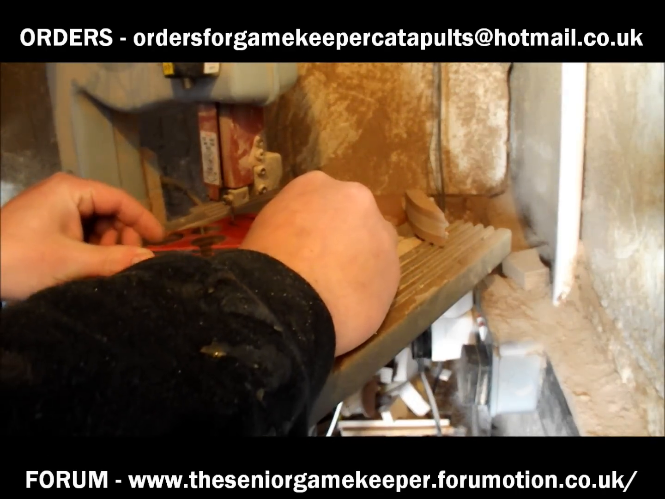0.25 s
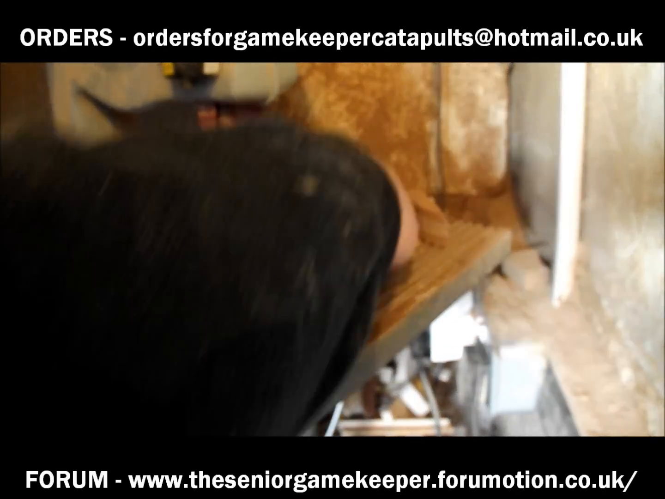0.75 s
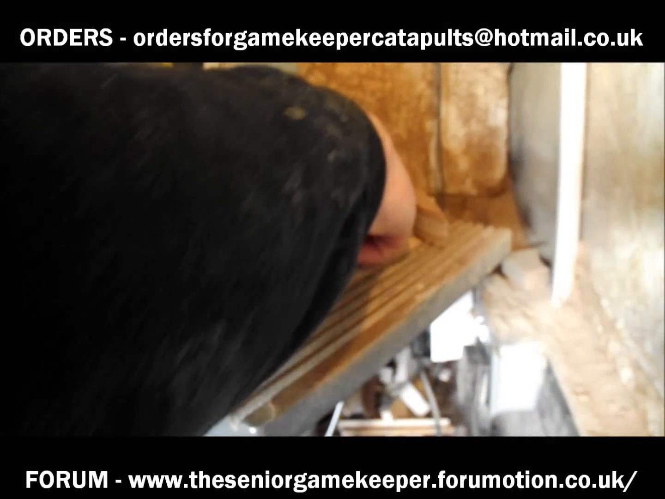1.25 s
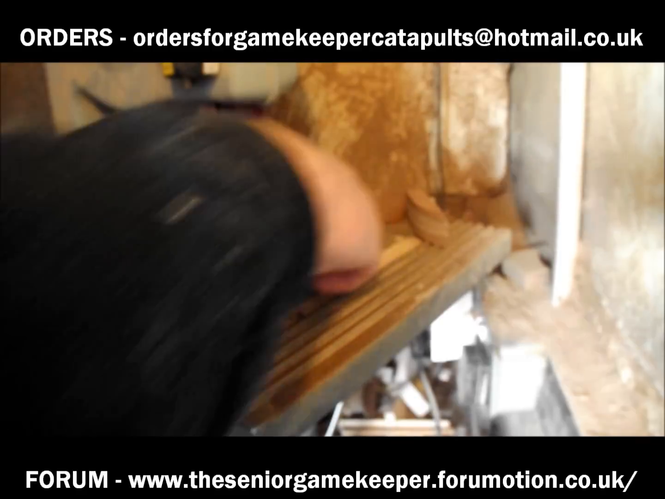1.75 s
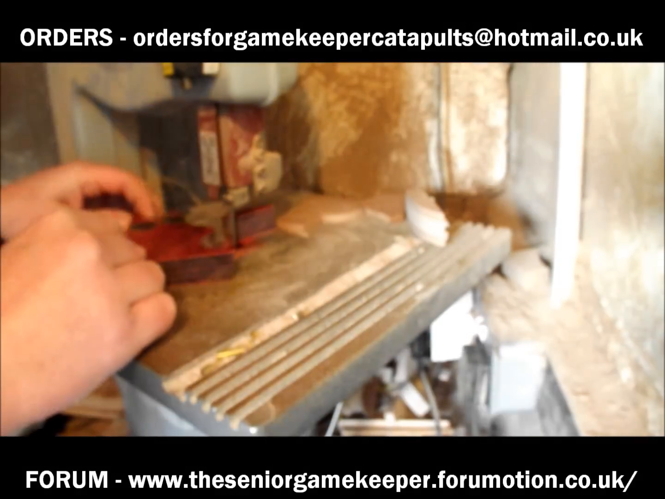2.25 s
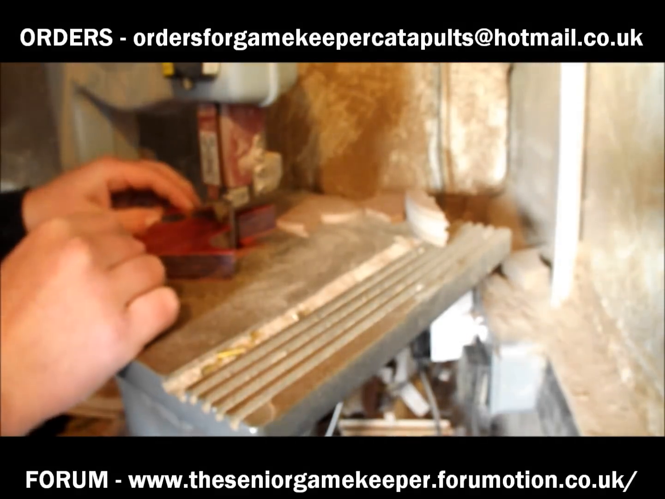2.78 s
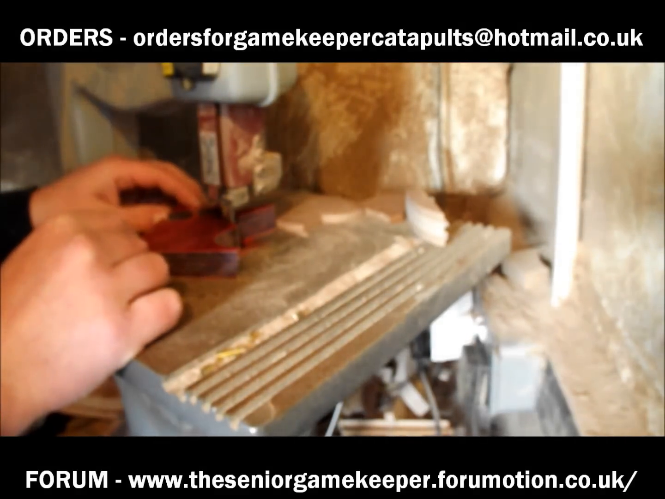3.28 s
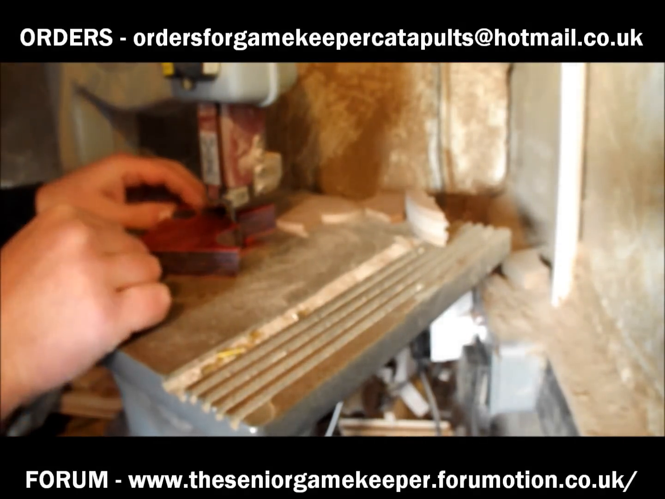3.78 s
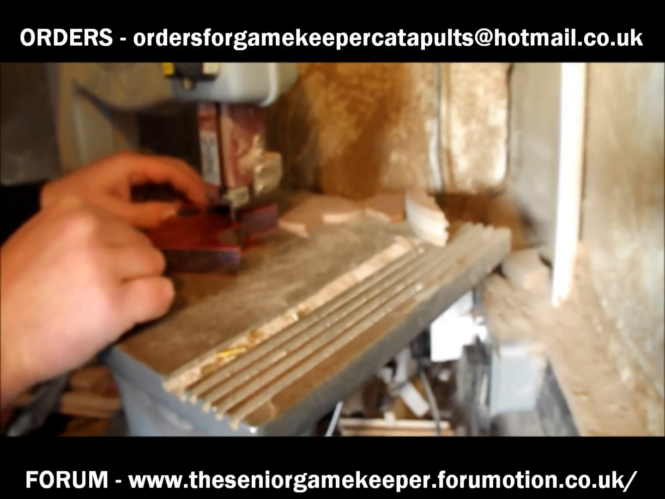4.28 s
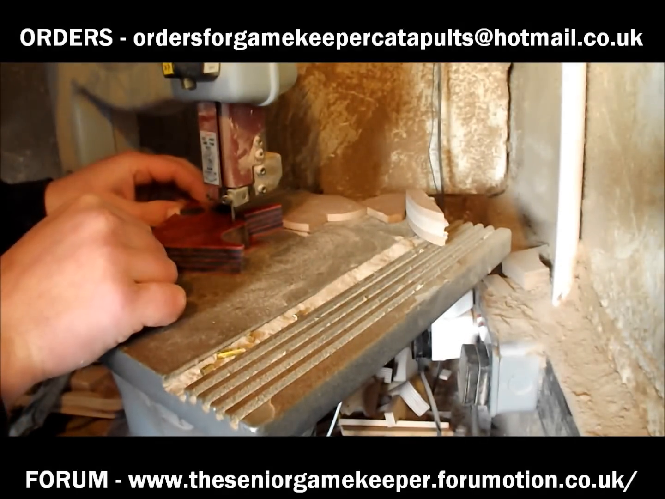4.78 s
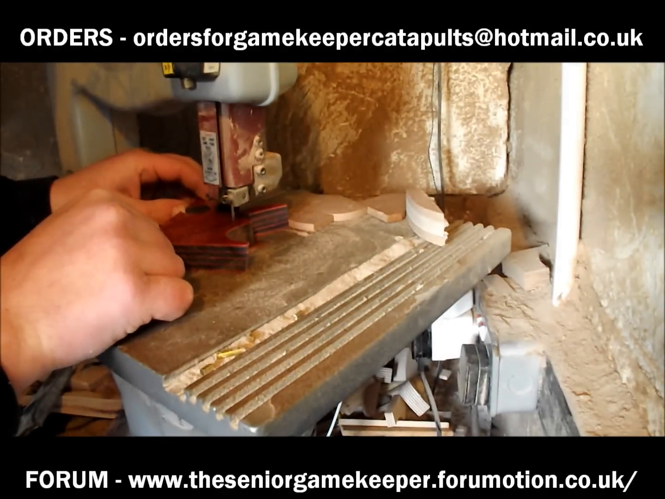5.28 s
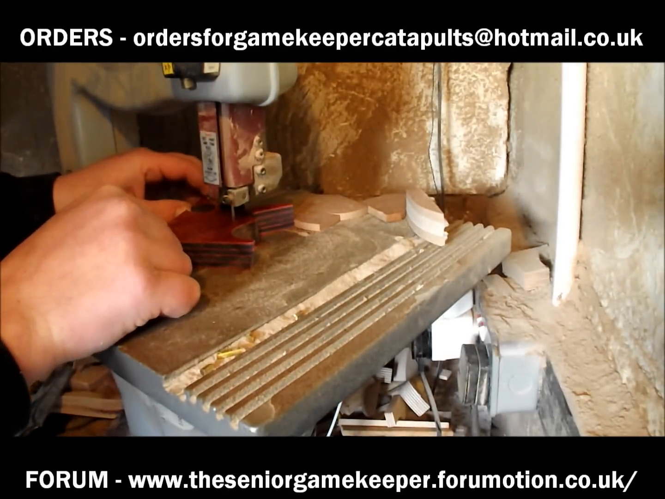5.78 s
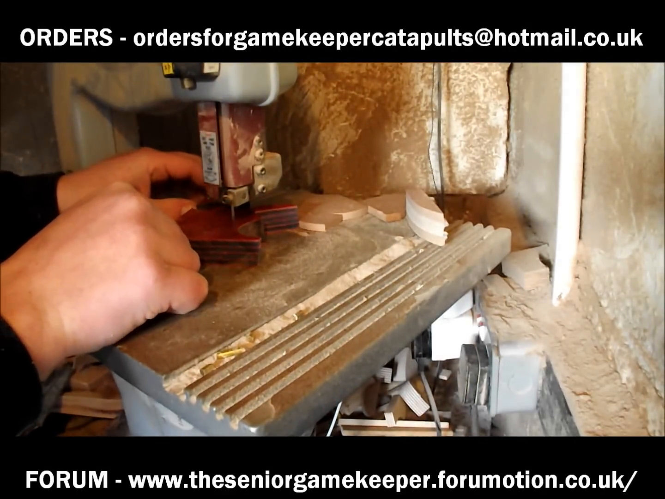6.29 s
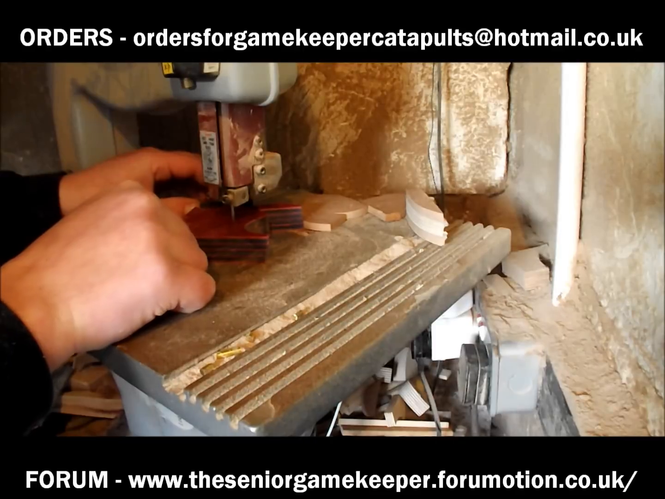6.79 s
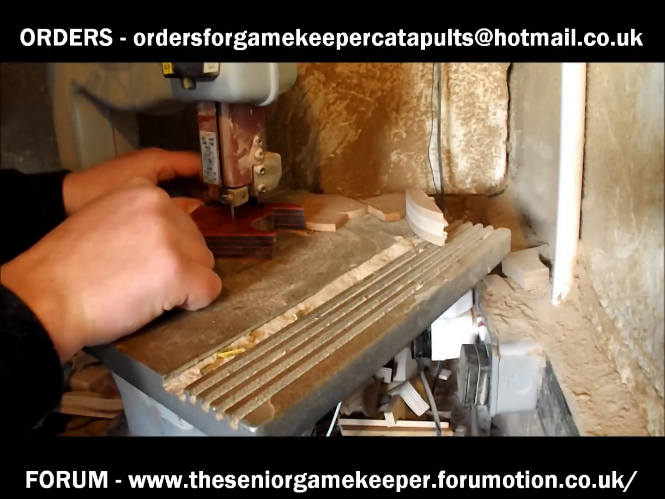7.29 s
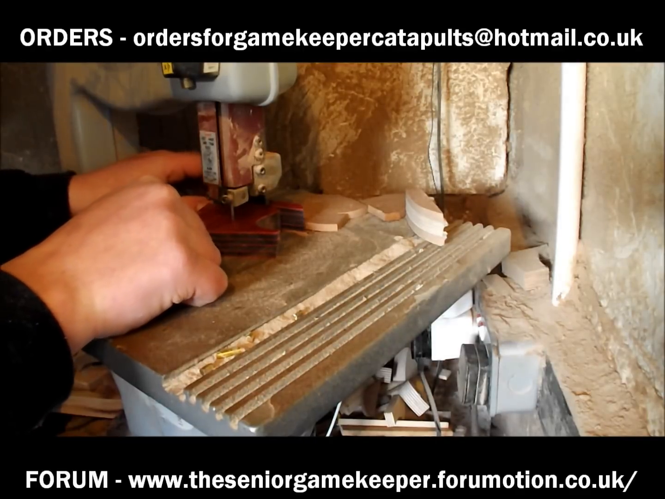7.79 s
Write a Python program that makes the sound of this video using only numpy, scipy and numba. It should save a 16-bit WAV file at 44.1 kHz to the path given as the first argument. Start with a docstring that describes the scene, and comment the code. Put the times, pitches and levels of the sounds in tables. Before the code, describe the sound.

Close, harsh bandsaw squeal stops, leaving motor hum, blade rattle and woody knocks, before a second sustained high screech begins and holds.

```python
"""In a shed, a small bandsaw runs close to a microphone with fast gain control. A cut ends, the saw runs
free while the blank is moved and knocks on the table, then a long cut begins. The motor is a sum of shaft
harmonics that slows under load; the blade rattle is noise pulsed once a turn and coloured by the frame.
Teeth scraping the wood are noise through resonances, with a sliding sine squeal; knocks are decaying modes.
A faint hiss falls through the treble. The gain control lifts the motor hum whenever the screech stops."""
import sys
import numpy as np
from scipy import signal
from scipy.fft import rfft, irfft, next_fast_len
from scipy.io import wavfile
from scipy.ndimage import uniform_filter1d
from numba import njit

SR = 44100
rng = np.random.default_rng(int(sys.argv[2]) if len(sys.argv) > 2 else 0)


def store_wav(level_fs):
    """Save 16-bit WAV to argv[1]."""
    pcm = np.round(np.clip(np.atleast_2d(level_fs), -1, 1) * 32767)
    wavfile.write(sys.argv[1], SR, pcm.T.astype(np.int16))


N = 355005

FREE_HZ, LOADED_HZ = 25, 24  # shaft turns per second, running free and at full load
WHEEL_TURNS, TEETH = 0.445, 77.2  # blade wheel turns and passing teeth, per shaft turn


def undb(db):
    """Decibel law: 20 dB are a factor of ten in amplitude."""
    return 10 ** (np.asarray(db) / 20)


def level(x, db):
    """Root-mean-square level: scale x to db relative to an RMS of 1."""
    return x * undb(db) / np.sqrt(np.mean(x ** 2))


def curve(table):
    """Linear interpolation: the columns of a table over time, sample by sample."""
    s, *columns = np.transpose(table)
    return [np.interp(np.arange(N) / SR, s, c) for c in columns]


def swells(rows):
    """Superposition: the sum of Gaussian bumps (time [s], length [s], height)."""
    t = np.arange(N) / SR
    return sum(h * np.exp(-(2 * (t - s) / length) ** 2) for s, length, h, *_ in rows)


def level_swells(rows):
    """Superposition in amplitude: bumps whose heights are given in dB."""
    return swells([(s, length, undb(db)) for s, length, db in rows])


def walk(rate):
    """Slow random modulation: levels held 1 / rate s and slewed twice; spread near 1."""
    hold = int(SR / rate)
    steps = np.repeat(rng.standard_normal(N // hold + 1), hold)
    return 1.2 * uniform_filter1d(uniform_filter1d(steps, hold), hold)[:N]


def noise():
    """White noise: equal mean power at every frequency."""
    return rng.standard_normal(N)


def colour(x, modes, spectrum=None):
    """Resonant filtering: modes add in power to a broad spectrum; the result has an RMS of 1."""
    size = next_fast_len(N + SR // 4)
    hz = np.arange(size // 2 + 1) * SR / size + 1e-3
    # each resonance is 6 dB down at the edges of its width
    power = sum(undb(2 * db) / (1 + (2 * (hz - f) / w) ** 2) ** 2 for f, w, db in modes)
    if spectrum is not None:
        f, db = np.transpose(spectrum)
        power = power + undb(2 * np.interp(np.log(hz), np.log(f), db, left=-80))
    return level(irfft(rfft(x, size) * np.sqrt(power), size)[:N], 0)


# start and end of the hiss: time [s], centre [Hz], level before the carrier [dB]; fade [s]
HISS_S, HISS_HZ, HISS_DB, HISS_FADE_S = (4.55, 5.7), (14500, 8200), (-30, -9), 0.08


def falling_hiss():
    """Amplitude modulation: low-pass noise on a falling sine makes a band of hiss that grows as it falls."""
    t = np.arange(N) / SR
    on = np.clip(np.minimum(t - HISS_S[0], HISS_S[1] - t) / HISS_FADE_S, 0, 1)
    hz = np.interp(t, HISS_S, HISS_HZ)
    db = np.interp(t, HISS_S, HISS_DB)
    slow_noise = level(uniform_filter1d(uniform_filter1d(noise(), size=48), size=48), 0)
    carrier = np.sin(2 * np.pi * np.cumsum(hz) / SR)
    return on * undb(db) * slow_noise * carrier


# motor hum running free: (multiple of the shaft turn, level over the shaft hum [dB])
FREE_HARMONICS = [(1, 0), (2, -29), (3, -19), (4, -18), (5, -13), (6, -20), (7, -4), (8, -16), (9, -18),
                  (10, -21), (11, -13), (12, -25), (13, -22), (14, -15), (15, -14), (16, -23), (17, -16),
                  (18, -18), (19, -18), (20, -24), (21, -27), (22, -25), (23, -36), (24, -32), (25, -28),
                  (26, -30), (27, -38), (28, -31), (29, -36), (30, -34), (31, -39), (32, -37), (33, -33),
                  (34, -34), (35, -32), (36, -25), (37, -21), (38, -32), (39, -36), (40, -33)]
# motor hum slowed by the cut: (multiple of the shaft turn, level over the shaft hum [dB])
LOADED_HARMONICS = [(1, 0), (2, -25), (3, -29), (4, -30), (5, -29), (6, -31), (7, -16), (8, -20), (9, -19),
                    (10, -35), (11, -24), (12, -21), (13, -30), (14, -32), (15, -23), (16, -28), (17, -11),
                    (18, -20), (19, -17), (20, -30), (21, -30), (22, -29)]
# hum swelling or fading around one multiple: (time [s], length [s], change [dB], multiple of the shaft turn)
HARMONIC_SWELLS = [(0.797, .3, 8, 37), (1.115, 0.089, 7, 37), (1.42, 0.41, 11, 37), (1.799, 0.22, 6.5, 37),
                   (2.35, .15, 6.5, 37), (2.665, 0.26, 7.5, 37), (3.184, 0.22, 11, 37),
                   (6.199, 1.1, 15, 39), (7.7, 1.2, -17, 37), (1.6, 2.5, -8, 18), (3.107, 0.66, 6.5, 18),
                   (6.4, 0.82, 6, 18)]
# change between swells, by central multiple: {multiple of the shaft turn: change [dB]}
HARMONIC_OFFSETS = {37: -6, 39: 0, 18: -3}
# dip of the whole hum after the first cut: (time [s], length [s], change [dB])
MOTOR_DIP = [(1.25, 0.29, -3)]


def motor(turns, load):
    """Harmonic series of a rotor: slowing moves it off the frame's resonances, so the pattern changes."""
    hum = np.sin(2 * np.pi * turns)
    loaded = dict(LOADED_HARMONICS)
    swell_db = {}
    for centre, offset_db in HARMONIC_OFFSETS.items():
        rows = [row for row in HARMONIC_SWELLS if round(row[3]) == centre]
        swell_db[centre] = offset_db + swells(rows)
    for k, free_db in FREE_HARMONICS[1:]:  # the first multiple is the shaft hum itself
        loaded_db = loaded.get(k, free_db - 5.0)
        wander_db = (1.6 + 0.088 * k) * (1 - 0.16 * load) * walk(6)
        heard_db = free_db + load * (loaded_db - free_db) + wander_db
        heard_db += sum(db for centre, db in swell_db.items() if abs(k - centre) < 2)
        phase = 2 * np.pi * (k * turns + rng.random()) + 0.25 * walk(5)
        hum += undb(heard_db) * np.sin(phase)
    return np.sqrt(2) * hum * undb(swells(MOTOR_DIP))


# broad spectrum of the blade in its guides: (frequency [Hz], relative level per Hz [dB])
GUIDE_SPECTRUM = [(40, -21), (200, -17.5), (450, -21), (750, -33.5), (1100, -30.5), (1900, -25),
                  (2600, -17.5), (3600, -17.5), (5000, -23), (6500, -33), (7800, -37), (15600, -53.5)]
# resonances of blade and frame: (frequency [Hz], width [Hz], relative level [dB])
FRAME_MODES = [(1301, 110, -20.5), (1474.3, 110, -12.5), (1629, 100, -14), (2381, 160, -11),
               (2592, 59, -14), (2802, 85, -11), (3033, 36, 2), (3145, 140, -7.5), (3298, 77, -1.5),
               (3460, 79, -25), (4030, 170, -10.5), (4160, 40, -4), (4295, 130, -9), (4745, 150, -13.5),
               (5160, 87, -21.5), (5610, 160, -19), (6154, 170, -23.5), (6520, 120, -24),
               (6600, 160, -21.5), (7036, 120, -19.5), (9760, 140, -31.5), (10210, 330, -35)]
# changes of the rattle: (time [s], length [s], change [dB])
RATTLE_CHANGES = [(.9, 0.48, 3), (1.25, 0.28, -5.5), (2.0, 1.9, -4), (7.5, 2.4, 2.5)]


def rattle(turns, load):
    """Periodic impact excitation: the blade slaps its guides each shaft turn and once a wheel turn."""
    size = undb(2.0 * rng.standard_normal(N // 1000))[turns.astype(int)]  # one strength per shaft turn
    shaft_slap = 1.2 * size * np.exp(-(turns % 1) / 0.52)
    wheel_slap = 0.56 * np.exp(-(WHEEL_TURNS * turns % 1) / 0.63)
    slapped = noise() * (1 + shaft_slap + wheel_slap) * undb(1.22 * walk(9))
    free_rattle = level(colour(slapped, FRAME_MODES, GUIDE_SPECTRUM), 3)
    return free_rattle * undb(-5.0 * load ** 2.2 + swells(RATTLE_CHANGES))


# the blank set down on the table: (time [s], dull wood level [dB], ring of the table level [dB])
BLOWS = [(1.414, -5, 11), (1.492, 11.5, 13.5), (1.547, 5.5, 14), (1.632, 9.5, 7), (1.811, -3, -9),
         (2.077, -6.5, 8.5), (2.085, 14.5, 9), (2.087, 12, 4), (2.089, 17.5, 11), (2.16, -9, 17),
         (2.177, -3, 8), (2.354, 0, 8.5), (2.444, -8.5, 9)]
# modes of the blank: (frequency [Hz], relative level [dB], 60 dB decay time [s])
WOOD_MODES = [(1263, -2.5, 0.048), (1830, -3.5, 0.047), (2260, -4.5, 0.065), (2648, -9, 0.045)]
# modes of the table: (frequency [Hz], relative level [dB], 60 dB decay time [s])
RING_MODES = [(3034, 4.5, 0.032), (3340, 0.5, 0.033), (4059, -12.5, 0.11)]
# band of the dull crack: (frequency [Hz], width [Hz], relative level [dB])
CRACK_BAND = [(2400, 2200, 0)]


def knocks():
    """Modal impact: a blow sets off a short noise crack and the decaying modes of blank and table."""
    out = np.zeros(N)
    t = np.arange(SR // 6) / SR
    onset = 1 - np.exp(-t / 0.0003)
    grit = colour(noise(), CRACK_BAND)
    for s, wood_db, ring_db in BLOWS:
        start = int(s * SR)
        place = slice(start, start + len(t))
        out[place] += 0.32 * undb(max(wood_db, ring_db)) * grit[place] * np.exp(-t / 0.0059) * onset
        for blow_db, modes in ((wood_db, WOOD_MODES), (ring_db, RING_MODES)):
            for f, db, t60 in modes:
                out[place] += undb(blow_db + db - 60 * t / t60) * np.sin(2 * np.pi * f * t) * onset
    return out


# course of the cut: (time [s], screech over the shaft hum [dB], squeal over the screech [dB], squeal [Hz])
CUT_COURSE = [(0.0, 15, 5, 4096), (0.3, 21, 4.5, 4060), (0.5, 23.5, 0.5, 4048), (0.75, 15.5, -3, 4054),
              (1.0, 15, -5.5, 4081), (1.12, 17.5, -21, 4080), (1.17, -24, -20, 4154),
              (3.44, -15.5, -20, 4045), (3.55, 6.5, -23.5, 4045), (3.9, 6.5, -20, 3970),
              (4.1, 13.5, -9, 4042), (4.5, 14, -15, 4051), (5.3, 15.5, -11, 4050), (6.1, 16.5, -7, 4038),
              (6.5, 18, -4.5, 4042), (7.3, 18, -9, 4021), (8.05, 17.5, -16, 4050)]
# resonances of the screeching blade: (frequency [Hz], width [Hz], relative level [dB])
BLADE_MODES = [(3410, 50, -7), (3490, 90, -1), (3580, 50, -4), (3650, 50, 1), (3720, 50, -4),
               (3800, 70, -4), (3943, 40, -3), (4150, 130, -9)]
# broad spectrum of teeth in the wood: (frequency [Hz], relative level per Hz [dB])
SCRAPE_SPECTRUM = [(300, -26.5), (590, -41), (960, -31), (2000, -34.5), (2850, -22), (3400, -15),
                   (4150, -15), (4600, -32.5), (5200, -31), (7000, -34), (9000, -44), (15600, -48.5)]
# resonances of blade and blank in the scrape: (frequency [Hz], width [Hz], relative level [dB])
BLANK_MODES = [(702, 35, -29.5), (782, 25, -25.5), (956, 77, -25.5), (1111.5, 36, -22.5), (1291, 55, -28),
               (1480, 88, -26), (1694, 24, -43), (2214, 59, -22), (2333, 110, -23.5), (2530, 68, -21.5),
               (2700, 88, -24.5), (3037, 100, -9.5), (3190, 76, -11.5), (3301, 48, -4.5), (4259, 42, -11.5),
               (4428, 30, -13), (4616, 150, -14), (4830, 60, -16), (5987, 44, -29.5)]
# changes of the scrape: (time [s], length [s], change [dB])
SCRAPE_CHANGES = [(.1, 0.37, 2), (.9, 0.61, 3), (4.6, 0.78, -0.5), (7.6, 1.363, -4)]
# treble of the scrape: (frequency [Hz], width [Hz], relative level [dB])
TREBLE_MODES = [(7650, 220, 0), (7520, 60, -3), (8000, 1500, -12)]
# changes of the treble: (time [s], length [s], change [dB])
TREBLE_CHANGES = [(.4, 1.8, 1), (5.0, 1.6, 1.5)]
# bright edge of a fresh cut: (frequency [Hz], width [Hz], relative level [dB])
EDGE_MODES = [(4709, 300, 0), (4290, 98, -2), (6050, 150, -14), (9960, 180, -30)]
# when the bright edge sounds: (time [s], length [s], level over the screech [dB])
EDGE_TIMES = [(3.745, 0.77, -9), (4.7, 1.07, -19)]
# narrow band of the whistle: (frequency [Hz], width [Hz], relative level [dB])
WHISTLE_MODES = [(8557, 51, 0)]
# when the whistle sounds: (time [s], length [s], level over the screech [dB])
WHISTLE_TIMES = [(.9, 0.37, -31.5), (5.75, 0.39, -32), (7.95, 0.51, -32)]
# the table humming with the cut: (frequency [Hz], width [Hz], relative level [dB])
TABLE_MODES = [(407, 43, 0)]
# changes of the table's drone: (time [s], length [s], change [dB])
DRONE_CHANGES = [(1.0, .5, 17), (3.9, 0.56, 21), (6.4, 0.76, 8)]
# scrape over the screech in a full cut [dB]; dB gained per dB the screech is weaker than FULL_CUT_DB
SCRAPE_DB, SCRAPE_LAG, FULL_CUT_DB = -9.5, 0.92, 18.5
TREBLE_DB, DRONE_DB = -30.5, -40.5  # over the screech, before swells
# the tooth tone is clear in a light cut and drowns as the load grows: level [dB], change [dB], exponent
TOOTH_DB, TOOTH_LOADED_DB, TOOTH_KNEE = -18.5, -20, 3.8


def cut(turns, load):
    """Forced vibration: teeth scrape the wood and shake the blade; the bite varies with each wheel turn."""
    screech_db, squeal_db, squeal_hz = curve(CUT_COURSE)
    weaker_db = np.clip(FULL_CUT_DB - screech_db, 0, 14)
    scrape_db = SCRAPE_DB + SCRAPE_LAG * weaker_db + swells(SCRAPE_CHANGES)
    treble_db = TREBLE_DB + swells(TREBLE_CHANGES)
    drone_db = DRONE_DB + swells(DRONE_CHANGES)
    tooth_db = TOOTH_DB + TOOTH_LOADED_DB * load ** TOOTH_KNEE

    wheel = 2 * np.pi * WHEEL_TURNS * turns
    bite_db = 1.2 * np.cos(wheel) + 1.0 * np.cos(2 * wheel + 1.2) + 0.75 * np.cos(4 * wheel + 1.9)
    bite_db += 0.8 * walk(25)
    chips = noise() * undb(bite_db + 1.7 * walk(300))
    tooth = np.sqrt(2) * np.sin(2 * np.pi * TEETH * turns + 0.83 * walk(30))
    squeal = np.sqrt(2) * np.sin(2 * np.pi * np.cumsum(squeal_hz) / SR + 1.0 * walk(80))

    ringing = colour(chips, BLADE_MODES)
    ringing += undb(squeal_db + bite_db + 3.8 * walk(90)) * squeal
    scraping = undb(scrape_db) * colour(chips, BLANK_MODES, SCRAPE_SPECTRUM)
    scraping += undb(treble_db) * colour(chips, TREBLE_MODES)
    scraping += level_swells(EDGE_TIMES) * colour(chips, EDGE_MODES)
    faint = level_swells(WHISTLE_TIMES) * colour(chips, WHISTLE_MODES)
    faint += undb(drone_db) * colour(chips, TABLE_MODES)
    faint += undb(tooth_db + bite_db) * tooth
    return undb(screech_db) * (ringing + scraping + faint)


# speed of the motor shaft: (time [s], turns per second [Hz])
SHAFT_SPEED = [(0, 24.02), (.45, 23.95), (.65, 23.85), (.95, 24.2), (1.13, 24.4), (1.2, 25), (3.46, 25),
               (3.6, 24.75), (3.8, 24.45), (4.2, 24.22), (5.1, 24.12), (6, 23.96), (6.8, 23.82),
               (8.05, 23.93)]


def scene():
    """Superposition of sources: one shaft speed gives the angle and load shared by motor, rattle and cut."""
    shaft_hz = curve(SHAFT_SPEED)[0]
    turns = np.cumsum(shaft_hz) / SR
    load = np.clip((FREE_HZ - shaft_hz) / (FREE_HZ - LOADED_HZ), 0, 1)
    background = falling_hiss() + motor(turns, load) + rattle(turns, load)
    return (background + knocks() + cut(turns, load))[None]


@njit
def peak_follower(x, start, over, attack, hold, release):
    """Peak detection: overshoots each new peak, waits, then sinks by a steady number of dB a second."""
    out, envelope, goal, wait = np.empty(len(x)), start, start, 0.
    for i in range(len(x)):
        if abs(x[i]) > goal:
            goal, wait = over * abs(x[i]), hold
        elif wait > 0:
            wait -= 1.
        else:
            goal *= release
        envelope += attack * (goal - envelope)
        out[i] = envelope
    return out


# followed peak held at TOP_DB re full scale; overshoot [dB]; low-pass edge [Hz]
TOP_DB, OVERSHOOT_DB, TOP_HZ = -2.5, 2.5, 15730
ATTACK_S, HOLD_S, RELEASE_DB_PER_S = 0.001, 0.008, 42


def record(dry):
    """Automatic gain control: ducks after each high peak and creeps back; full scale clips; the top is cut."""
    start = np.abs(dry[0, :SR // 5]).max()
    over = float(undb(OVERSHOOT_DB))
    release = float(undb(-RELEASE_DB_PER_S / SR))  # factor per sample
    peak = peak_follower(dry[0], start, over, 1 / (ATTACK_S * SR), HOLD_S * SR, release)
    held = np.clip(dry * undb(TOP_DB) / peak, -1, 1)
    low_pass = signal.ellip(12, 0.2, 90, TOP_HZ, fs=SR, output="sos")
    return signal.sosfilt(low_pass, held)


dry = scene()
out = record(dry)
store_wav(out)
```